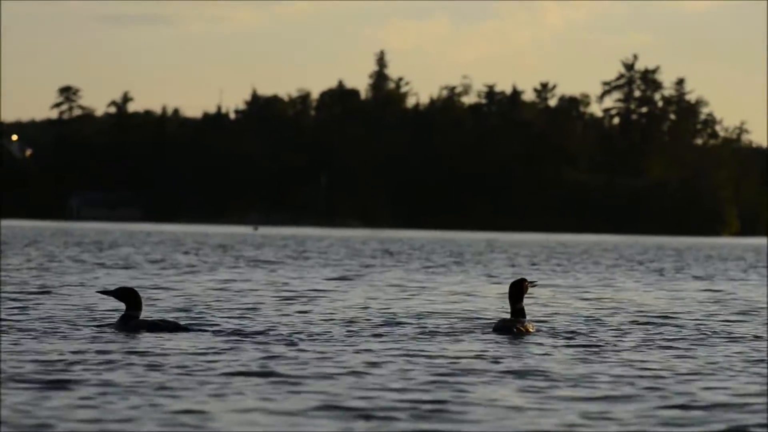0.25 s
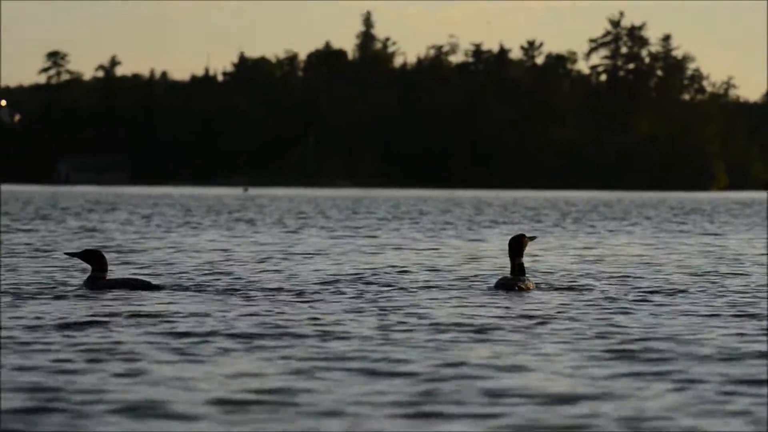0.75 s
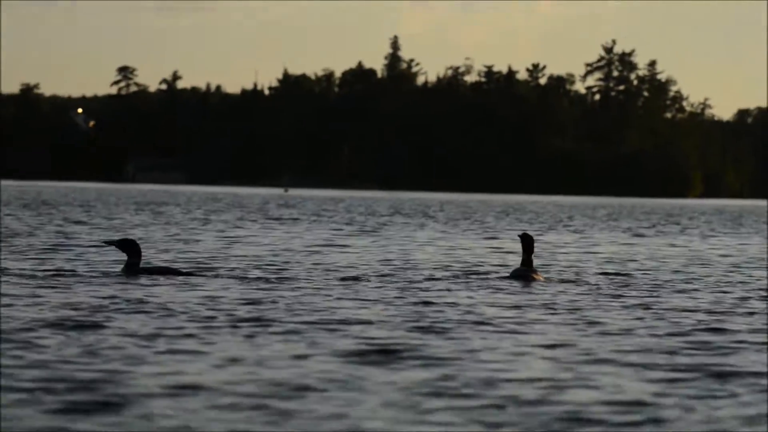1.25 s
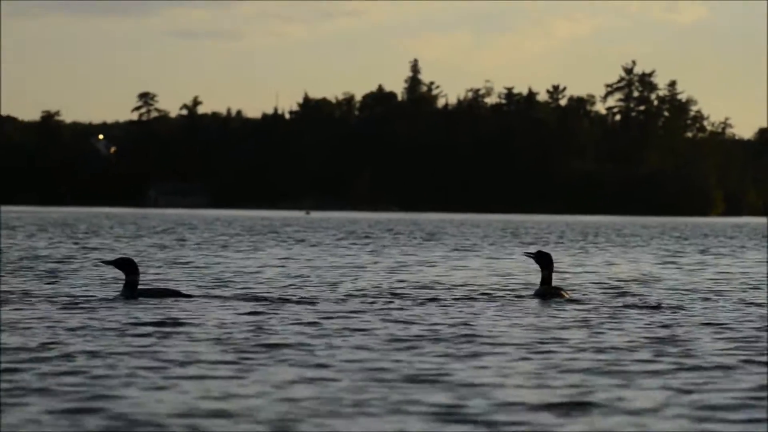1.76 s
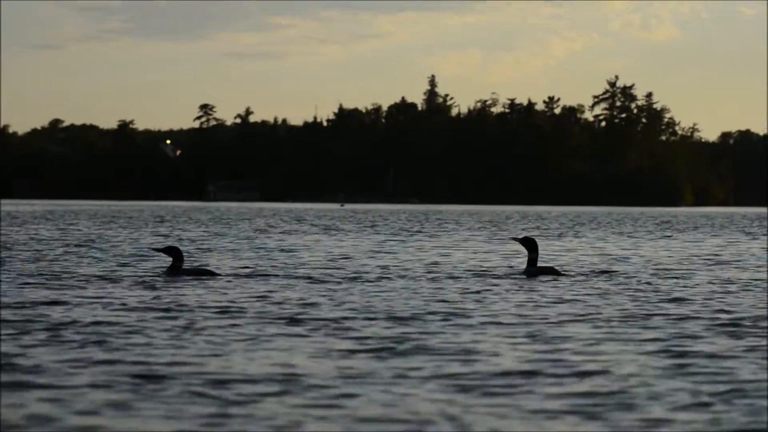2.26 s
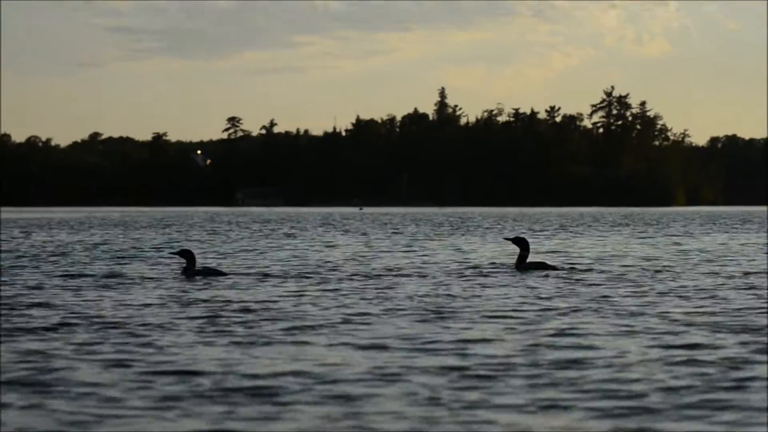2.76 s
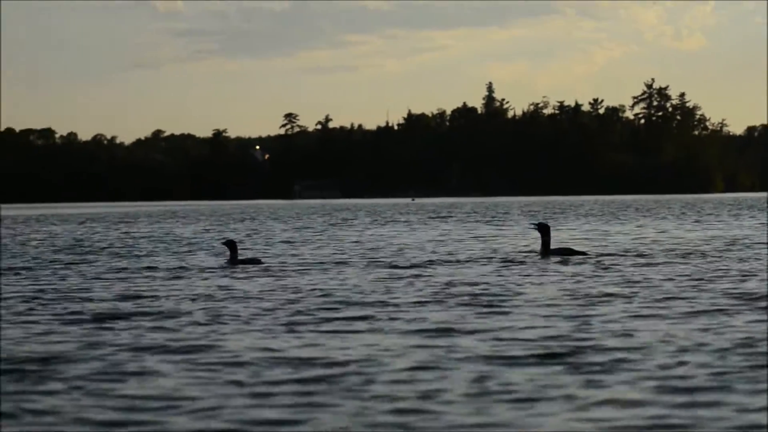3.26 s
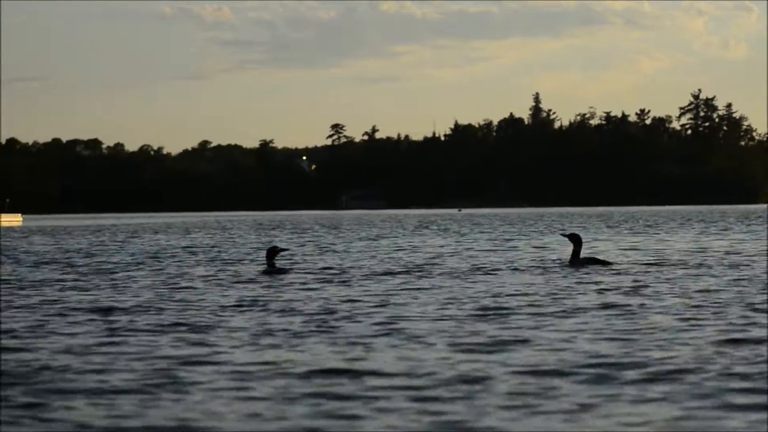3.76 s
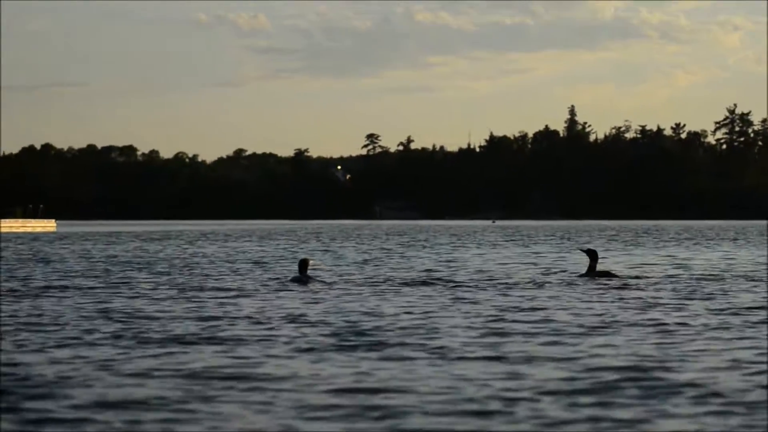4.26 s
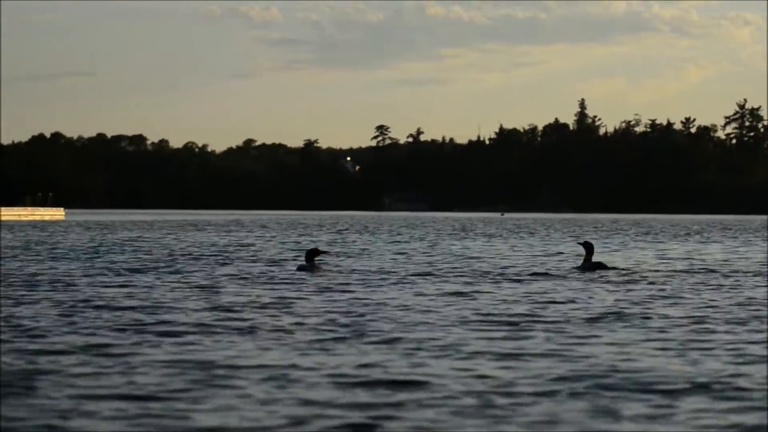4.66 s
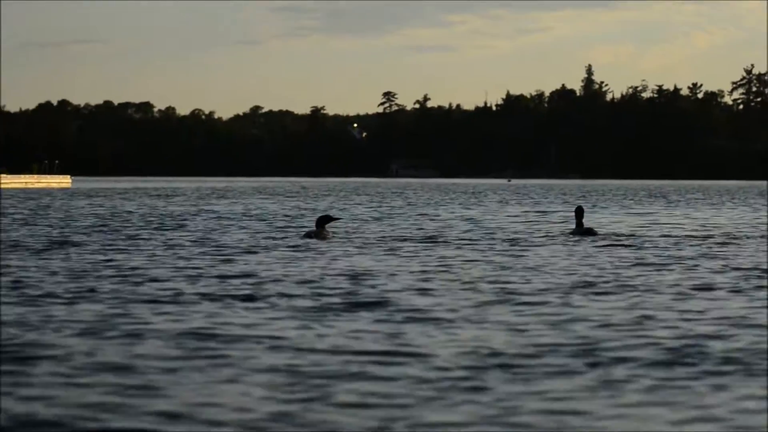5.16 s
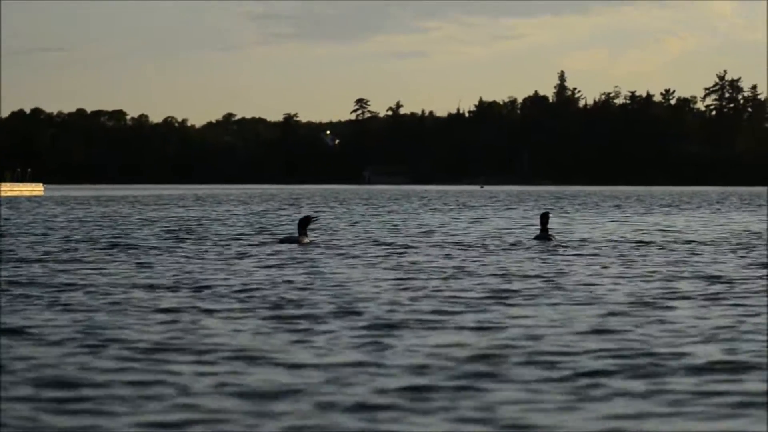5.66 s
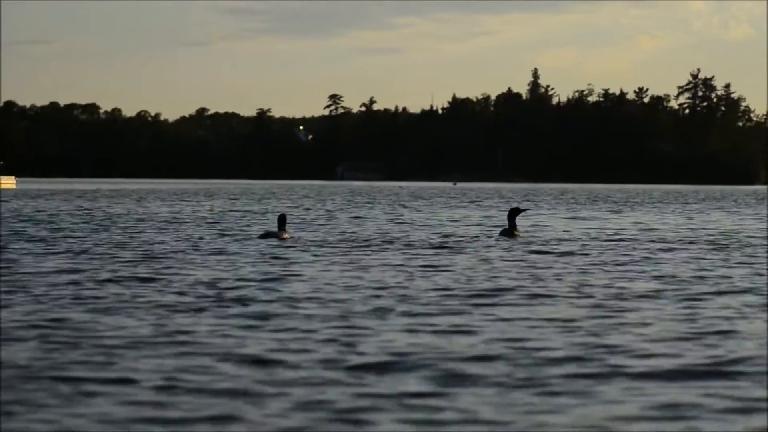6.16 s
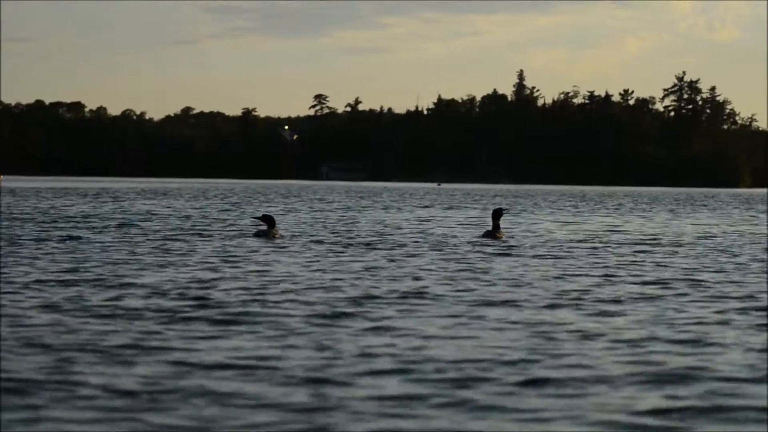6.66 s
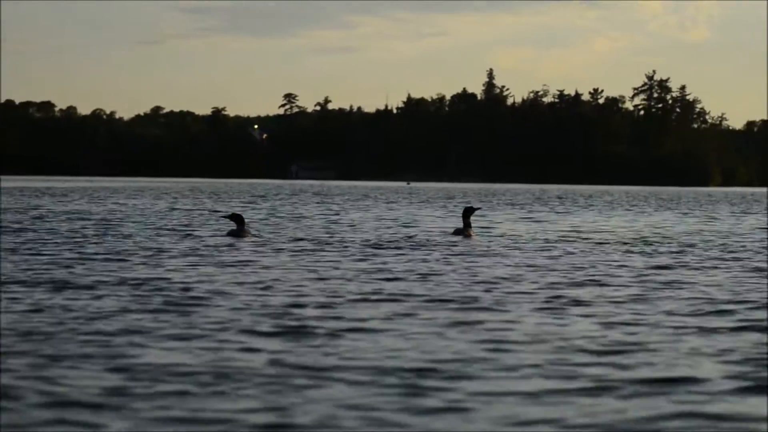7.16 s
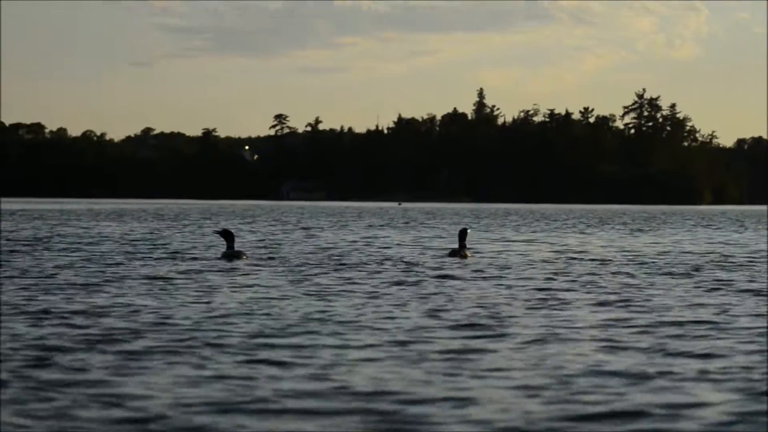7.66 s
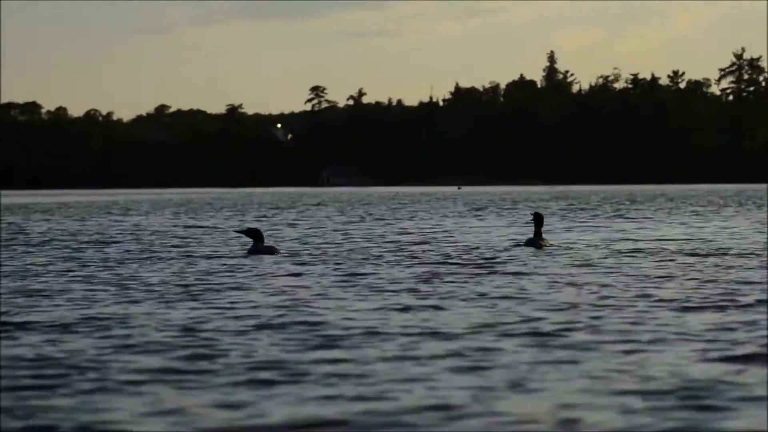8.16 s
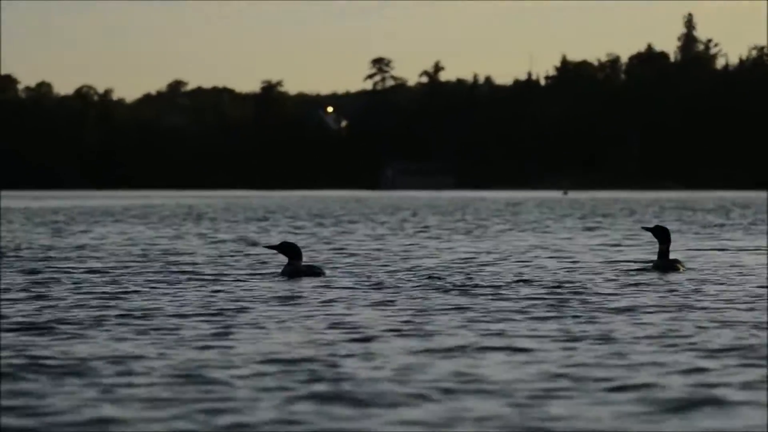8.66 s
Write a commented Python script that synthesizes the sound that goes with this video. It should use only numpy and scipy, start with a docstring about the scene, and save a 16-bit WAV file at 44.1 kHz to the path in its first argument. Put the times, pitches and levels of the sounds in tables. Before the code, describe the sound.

Wavering loon calls leap upward and ring with a long echo, while a breeze rumbles and the microphone hisses.

```python
"""An evening lake, where two loons trade tremolo calls. Each call is a nearly pure tone, modulated in
pitch and level about ten times a second, that breaks upward from register to register. Reflections
from the wooded shore hold the notes as a long ringing echo. Eddies of a breeze buffet the microphone
of a hand-held camera, which hisses, rustles and clicks; a small bird chips far away."""
import sys
import numpy as np
from scipy import signal
from scipy.fft import rfft, irfft, next_fast_len
from scipy.io import wavfile
from scipy.ndimage import map_coordinates

SR = 44100
rng = np.random.default_rng(int(sys.argv[2]) if len(sys.argv) > 2 else 0)


def transcribe(signal):
    """Save signal, clipped to [-1, 1], as a 16-bit WAV file at the path in sys.argv[1]."""
    frames = np.atleast_2d(signal).T
    limited = np.clip(frames, -1, 1)
    pcm = np.round(limited * 32767).astype(np.int16)
    wavfile.write(sys.argv[1], SR, pcm)


N = 393372
TIME = np.arange(N) / SR
TOP_HZ, EDGE_S = 15850, .004  # upper band limit; half the ramp at each end of a note


# Notes of the first loon, a table per register; the tremolo swings down from its crests. Each row: start,
# end and time of one crest in seconds, tremolo rate in Hz, crest pitch in Hz, glide in octaves per second,
# swing in octaves, crest level in dB, level slope in dB per second, overtone offset in dB.
FIRST_LOW_NOTES = [(0.325, 0.464, 0.34, 9.5, 778.0, 1.78, 0.22, -19.3, 55.0, -2.2),
                   (1.695, 1.781, 1.704, 11.4, 795.0, 4.39, 0.24, -20.7, 136.0, -1.9),
                   (3.092, 3.18, 3.09, 11.5, 772.0, 4.9, 0.17, -19.1, 214.0, 2.3),
                   (4.905, 5.127, 4.913, 9.7, 804.0, 1.74, 0.26, -22.6, 82.0, -1.0),
                   (5.485, 5.58, 5.525, 9.1, 754.0, -0.22, 0.17, -22.2, -53.0, 0.1),
                   (6.438, 6.535, 6.45, 11.4, 804.0, 3.36, 0.22, -19.0, 123.0, 4.0),
                   (8.064, 8.154, 8.084, 11.1, 827.0, 3.06, 0.23, -18.8, 89.0, 0.6)]
FIRST_MIDDLE_NOTES = [(0.465, 0.918, 0.541, 10.1, 1216.0, -0.3, 0.34, -13.7, -20.0, -0.7),
                      (1.782, 1.937, 1.792, 11.1, 1286.0, 0.61, 0.3, -10.6, -9.0, 1.7),
                      (3.181, 3.342, 3.177, 11.4, 1301.0, 0.78, 0.34, -9.0, -44.0, 3.2),
                      (5.128, 5.485, 5.117, 10.8, 1300.0, -0.38, 0.41, -12.3, -17.0, -0.8),
                      (6.536, 6.716, 6.541, 11.2, 1312.0, 0.53, 0.35, -9.5, -20.0, 2.2),
                      (6.972, 7.078, 7.024, 8.0, 1019.0, -0.27, 0.08, -22.4, 34.0, 0.3),
                      (8.155, 8.322, 8.177, 11.1, 1320.0, 0.36, 0.32, -9.5, -15.0, -3.3),
                      (8.606, 8.713, 8.661, 8.2, 1068.0, -0.52, 0.12, -20.7, -24.0, 8.6)]
FIRST_TOP_NOTES = [(1.938, 2.312, 1.978, 10.8, 1486.0, -0.43, 0.22, -12.7, -22.0, 2.1),
                   (3.343, 3.692, 3.363, 10.8, 1499.0, -0.52, 0.25, -13.5, -21.0, 4.8),
                   (6.717, 6.97, 6.73, 10.7, 1499.0, -0.45, 0.25, -12.4, -18.0, -0.1),
                   (8.323, 8.603, 8.363, 10.8, 1508.0, -0.36, 0.21, -12.5, -14.0, -4.0)]
# Resonances of its throat and bill. Each row: frequency in Hz, relative overtone level in dB.
FIRST_LOW_TRACT = [(1200, -0.5), (1520, -2), (1800, -10), (1950, -25), (2300, -14.5), (2750, -45),
                   (3300, -34), (4100, -29), (5000, -39.5), (6200, -47.5), (8000, -49.5), (14000, -74)]
FIRST_UPPER_TRACT = [(1200, -6), (1520, 0), (1900, -26), (2300, -19), (2750, -40), (3200, -38.5),
                     (3900, -29.5), (4500, -32.5), (5200, -38), (5900, -56), (6600, -43), (7500, -58.5),
                     (10000, -64.5), (15000, -86.5)]

def first_loon():
    """Register breaks: the voice climbs in jumps through three modes of vibration."""
    low = tremolo(FIRST_LOW_NOTES, slowing=.03, shape=1.44, dip_db=31, deepen=-2.3, lead_s=-.006,
                  scoop_s=.03)
    middle = tremolo(FIRST_MIDDLE_NOTES, slowing=.24, shape=1.16, dip_db=25, deepen=.3, lead_s=.001,
                     arch=2.42, arch_db=14)
    top = tremolo(FIRST_TOP_NOTES, slowing=.28, shape=1.21, dip_db=44, deepen=1.3, lead_s=.002,
                  arch=1.48, arch_db=36)
    return (sing(low + moans(), FIRST_LOW_TRACT, overtone_db=2.2, crest_db=12, tilt_db=-3,
                 jitter=.0036, rasp=.15, third_db=-40.5, attack_s=.0035, crack_out=.055)
            + sing(middle, FIRST_UPPER_TRACT, overtone_db=0, crest_db=18, tilt_db=-6.5,
                   jitter=.00074, rasp=.06, third_db=-43, attack_s=.0033, crack_in=.03)
            + sing(top, FIRST_UPPER_TRACT, overtone_db=-3.5, crest_db=-4, tilt_db=3.3,
                   jitter=.0007, rasp=.05, third_db=-63, attack_s=.003))


# Notes of the second loon, with the same columns as those of the first.
SECOND_LOW_NOTES = [(1.312, 1.425, 1.308, 8.9, 860.0, 2.86, 0.3, -19.4, 72.0, -8.0),
                    (3.39, 3.538, 3.416, 7.2, 876.0, 3.75, 0.37, -26.1, 84.0, -12.4),
                    (3.705, 3.82, 3.745, 9.5, 777.0, -0.13, 0.24, -27.3, -78.0, -11.7),
                    (5.585, 5.755, 5.577, 10.0, 857.0, 1.3, 0.31, -21.9, 42.0, -9.6),
                    (7.333, 7.432, 7.341, 10.8, 827.0, 2.83, 0.28, -23.2, 66.0, -5.7)]
SECOND_MIDDLE_NOTES = [(1.427, 1.755, 1.409, 10.9, 1237.0, -1.01, 0.45, -11.8, -38.0, -7.8),
                       (3.54, 3.7, 3.533, 11.0, 1241.0, 0.39, 0.45, -20.3, 24.0, -10.4),
                       (5.756, 6.036, 5.775, 10.2, 1241.0, -1.03, 0.47, -13.4, -23.0, -11.0),
                       (7.434, 7.792, 7.433, 10.9, 1254.0, -0.85, 0.45, -11.4, -18.0, -6.4)]
# Resonances of its throat and bill. Each row: frequency in Hz, relative overtone level in dB.
SECOND_TRACT = [(1200, -20), (1550, -0.5), (1950, -23), (2300, -21), (2750, -42), (3300, -22), (4000, -30),
                (4900, -26), (6000, -45.5), (7700, -37.5), (9200, -54.5), (15000, -67)]

def second_loon():
    """Jitter: a less regular vibration makes this voice harsher; it keeps to two registers."""
    low = tremolo(SECOND_LOW_NOTES, slowing=.08, shape=1.43, dip_db=15.4, deepen=1.6, scoop_s=.025)
    middle = tremolo(SECOND_MIDDLE_NOTES, slowing=.38, shape=1.61, dip_db=19.4, deepen=1.6, lead_s=.003,
                     arch=4.98, arch_db=17)
    return (sing(low, SECOND_TRACT, overtone_db=13.5, crest_db=16, tilt_db=-1.2,
                 jitter=.007, rasp=.15, third_db=-50, attack_s=.0073, crack_out=.075)
            + sing(middle, SECOND_TRACT, overtone_db=4, crest_db=21, tilt_db=-1,
                   jitter=.002, rasp=.15, third_db=-58.5, attack_s=.0074, crack_in=.04))


def tremolo(notes, slowing, shape, dip_db, deepen, lead_s=0, arch=0, arch_db=0, scoop_s=0):
    """Coupled frequency and amplitude modulation: level falls with pitch (dip_db, arch_db per octave)."""
    scoop_octaves, scoop_db = .6, 20  # a scooped note slides in from this much lower and softer
    gestures = []
    for start, end, crest, rate, hz, glide, swing, db, slope, overtone_db in notes:
        t = TIME[(TIME > start - scoop_s - EDGE_S) & (TIME < end + EDGE_S)]
        from_middle = t - (start + end) / 2
        trough = lambda u: 1 - np.abs(np.cos(np.pi * rate * u * (1 - slowing * u))) ** shape
        sag = arch * from_middle ** 2
        scoop = np.clip((start + EDGE_S - t) / scoop_s, 0, 1) if scoop_s else 0
        octaves = glide * from_middle - sag - swing * trough(t - crest) - scoop_octaves * scoop
        dip = dip_db * swing * (1 + deepen * (t - start)) * trough(t - crest + lead_s)
        level_db = db + slope * from_middle - arch_db * sag - dip - scoop_db * np.sqrt(scoop)
        gestures.append((t, hz * 2 ** octaves, level_db, overtone_db))
    return gestures


# Moans that close the calls. Each row: start in seconds, initial pitch in Hz, initial level in dB.
CLOSING_MOANS = [(.918, 672, -30), (2.322, 697, -30), (6.037, 672, -32), (7.076, 675, -29),
                 (7.793, 660, -34), (8.713, 680, -33)]

def moans(length_s=.065, sag_hz_per_s=700, fade_db_per_s=170, overtone_db=-1):
    """Falling driving pressure: as the breath runs out, pitch and level sink together."""
    t = TIME[TIME < length_s]
    return [(start + t, hz - sag_hz_per_s * t, db - fade_db_per_s * t, overtone_db)
            for start, hz, db in CLOSING_MOANS]


def sing(gestures, tract, overtone_db, crest_db, tilt_db, jitter, rasp, third_db, attack_s,
         crack_in=0, crack_out=0):
    """Source and filter: throat and bill weight the harmonics of a nearly pure tone."""
    crack_s, choke_db = .022, 5  # the voice is rough around a register break and weaker just before it
    out = np.zeros(N)
    loudest_db = max(db.max() for _, _, db, _ in gestures)
    for t, pitch, db, offset_db in gestures:
        since, until = t - t[0], t[-1] - t
        crack = crack_in * swell(since, crack_s) + crack_out * swell(until, crack_s)
        rough_pitch = pitch * (1 + jitter * wobble(500, t) + crack * wobble(900, t))
        phase = 2 * np.pi * np.cumsum(rough_pitch) / SR
        # brightness follows the bird's push at each crest, and soft notes are duller
        push_db = crest_db * np.log2(pitch / pitch.mean())
        bright_db = overtone_db + offset_db + push_db + .27 * (db.max() - loudest_db)
        overtones = 0
        for k in range(2, 13):
            octaves_up = np.log2(k / 2)
            level_db = along(tract, k * pitch) + bright_db + tilt_db * octaves_up + 4 * wobble(35, t)
            flutter = 1 + rasp * octaves_up * wobble(700, t)
            overtones += amp(level_db) * flutter * np.sin(k * phase) * (k * pitch < TOP_HZ)
        # period tripling: under strain every third cycle differs, adding faint lines between harmonics
        strain = amp(third_db + push_db + 3.3 * wobble(12, t))
        overtones += strain * sum(np.sin(k * phase / 3) for k in (2, 4, 5))
        gate = np.sin(np.pi / 2 * np.clip(np.minimum(since, until) / (2 * EDGE_S), 0, 1)) ** 2
        choke = amp(-choke_db * swell(until, crack_s)) if crack_out else 1
        tone = choke * np.sin(phase) + overtones * (1 - np.exp(-since / attack_s))
        envelope = amp(db + .19 * wobble(120, t)) * gate
        out[round(t[0] * SR):][:len(t)] += np.sqrt(2) * envelope * tone
    return out


# Reverberation of the wooded shore. Each row: frequency in Hz, time to decay by 60 dB in seconds.
SHORE_DECAY = [(500, 4.3), (1000, 3.44), (1500, 1.9), (4500, 2.4), (9000, 0.66)]
# Colour of the echo. Each row: frequency in Hz, relative gain in dB.
SHORE_COLOUR = [(500, -21), (800, -7.5), (1050, -2.5), (1500, 2), (1900, -9), (2500, -3), (3300, -12),
                (4600, 0), (9000, -8.5)]

def shore_echo(calls, echo_db, build_s, ripple_db):
    """Reverberation: trees at all distances return a slow tail; nearby wavelets mirror the overtones."""
    hz, t, spectra = signal.stft(rng.standard_normal(3 * SR), SR, nperseg=256)
    envelope = amp(-60 * t / along(SHORE_DECAY, hz)[:, None]) * (1 - np.exp(-t / build_s))
    tail = signal.istft(spectra * envelope, SR, nperseg=256)[1]
    tail = filtered(tail, lambda f: amp(along(SHORE_COLOUR, f) + echo_db)) / np.sqrt(SR)
    # early reflections interfere, so each overtone swells and fades as it sweeps
    ripples = unit(rng.standard_normal(len(tail))) * amp(-60 * TIME[:len(tail)] / .03)
    ripples = filtered(ripples / np.linalg.norm(ripples), lambda f: f ** 6 / (f ** 6 + 2000 ** 6))
    return signal.fftconvolve(calls, tail + amp(ripple_db) * ripples)[:N]


def lingering_echo(level_db, t60_s):
    """Free decay: at the outset the shore still rings in the bands of an earlier call."""
    call_bands = [(700, -43.5), (980, -11), (1220, -9), (1350, -24), (1520, -11), (1750, -54)]
    return amp(level_db - 60 * TIME / t60_s) * noise(call_bands)


# Strength of the breeze. Each row: time in seconds, rumble level in dB.
BREEZE_LEVEL = [(0, -43), (.4, -34), (.9, -38), (1.7, -37), (2.6, -29.5), (3.1, -36.5), (3.45, -41),
                (4, -36), (5.6, -35.5), (6.3, -37.5), (7, -40), (8.3, -37.5), (8.55, -47), (8.85, -43)]
# Spectrum of its rumble. Each row: frequency in Hz, relative level in dB.
RUMBLE_SPECTRUM = [(20, -19), (45, -5), (80, 0), (170, -4.5), (300, -15.5), (600, -34), (1500, -66.5)]
# Single eddies. Each row: peak time in seconds, relative level in dB, length in seconds, corner in Hz.
EDDIES = [(0.051, -15.7, 0.024, 240), (0.288, -21.3, 0.017, 190), (0.38, -21.3, 0.019, 190),
          (0.746, -22.7, 0.014, 210), (1.258, -19.0, 0.032, 200), (1.625, -22.6, 0.017, 310),
          (1.829, -18.5, 0.014, 170), (2.047, -21.4, 0.027, 320), (2.448, -13.9, 0.024, 340),
          (2.624, -17.6, 0.013, 170), (2.722, -13.3, 0.022, 260), (2.815, -15.1, 0.024, 220),
          (2.961, -16.6, 0.029, 270), (3.077, -17.9, 0.014, 160), (3.161, -13.6, 0.026, 280),
          (3.769, -25.0, 0.013, 310), (4.126, -21.6, 0.033, 230), (4.205, -13.9, 0.015, 220),
          (4.354, -20.7, 0.017, 160), (4.524, -20.2, 0.018, 220), (4.739, -12.1, 0.019, 250),
          (4.93, -14.2, 0.017, 240), (5.2, -16.9, 0.029, 330), (5.409, -22.2, 0.017, 230),
          (5.536, -18.3, 0.024, 330), (5.627, -16.5, 0.014, 230), (5.713, -18.8, 0.014, 190),
          (6.239, -22.1, 0.015, 190), (6.602, -24.4, 0.017, 160), (7.186, -22.3, 0.017, 180),
          (7.446, -23.4, 0.015, 150), (7.53, -21.2, 0.013, 290)]

def wind(eddy_db, lump_db):
    """Turbulent pressure: separate eddies thump the microphone over a rumble that comes and goes."""
    out = amp(curve(BREEZE_LEVEL) + lump_db * np.tanh(wobble(18))) * noise(RUMBLE_SPECTRUM)
    for peak, db, length, corner_hz in EDDIES:
        span = abs(TIME - peak) < .12
        envelope = swell(TIME[span] - peak, length)
        low_cut = lambda hz: hz ** 2 / np.hypot(hz ** 2, 65 ** 2)
        band = lambda hz: low_cut(hz) / np.hypot(1, (hz / corner_hz) ** 3) / np.hypot(1, (hz / 800) ** 4)
        eddy = envelope * filtered(rng.standard_normal(len(envelope)), band)
        out[span] += amp(db + eddy_db) * unit(eddy) * np.sqrt(np.mean(envelope ** 2))
    return out


# Fingers sliding on the camera. Each row: peak time in seconds, level in dB, length in seconds.
FINGER_RUBS = [(0.842, -46, 0.021), (0.916, -59, 0.2), (1.354, -52.5, 0.01), (2.903, -62, 0.13),
               (8.078, -52.5, .22), (8.8, -62, .2)]
# Clicks of its body. Each row: start in seconds, level in dB, time to decay by 60 dB in seconds.
BODY_CLICKS = [(.839, -38, .008), (0.985, -33, 0.018), (2.978, -21, 0.018), (4.803, -21, .08),
               (8.099, -40, 0.007)]
# Spectra of the rubs and of the clicks. Each row: frequency in Hz, relative level in dB.
RUB_SPECTRUM = [(1500, -5), (4500, -3), (8500, 0.5), (12000, -5.5), (15500, -24.5)]
CLICK_SPECTRUM = [(200, -1.5), (700, 2.5), (1700, -2.5), (2600, -9.5), (3200, -8), (4000, -13),
                  (4900, -10.5), (6200, -14), (7800, -14.5), (11000, -28.5), (15000, -39.5)]

def handling():
    """Friction and impact: sliding skin rustles, and the camera body clicks with a damped decay."""
    rubs = sum(amp(db) * swell(TIME - peak, length) for peak, db, length in FINGER_RUBS)
    clicks = sum(amp(db - 60 * abs(TIME - start) / t60) * (TIME >= start)
                 for start, db, t60 in BODY_CLICKS)
    return rubs * noise(RUB_SPECTRUM) + clicks * noise(CLICK_SPECTRUM)


# Drift of the hiss. Each row: time in seconds, relative level in dB.
HISS_LEVEL = [(0, -69), (.75, -72), (1.1, -69.5), (2.3, -74), (2.9, -69.5), (6.85, -72), (8.9, -69.5)]
# Spectrum of the hiss. Each row: frequency in Hz, relative level in dB.
HISS_SPECTRUM = [(100, 11), (700, 17.5), (1400, 18.5), (2000, 7.5), (3400, 4.5), (5000, 3), (9000, -1.5),
                 (15500, -6)]
# Tones of the camera electronics. Each row: frequency in Hz, level in dB.
WHINE_TONES = [(7628, -86), (10164, -84)]

def camera_hiss(gain_db):
    """Noise floor: a wavering broadband hiss, with the thin steady whine of the electronics."""
    hiss = amp(curve(HISS_LEVEL) + gain_db) * noise(HISS_SPECTRUM)
    whine = sum(np.sqrt(2) * amp(db) * np.sin(2 * np.pi * hz * TIME) for hz, db in WHINE_TONES)
    return hiss + whine


# Chips of the small bird. Each entry: peak time in seconds.
CHIP_TIMES = [3.925, 4.04, 4.171, 4.29, 4.415, 4.546]

def small_bird(pitch_hz, level_db, length_s):
    """Narrow-band noise pulses: thin chips, their pitch blurred by distance."""
    band = unit(filtered(rng.standard_normal(N), lambda hz: swell(hz - pitch_hz, 450)))
    return amp(level_db) * band * sum(swell(TIME - peak, length_s) for peak in CHIP_TIMES)


def amp(db):
    """Decibels as an amplitude ratio."""
    return 10 ** (np.asarray(db) / 20)


def unit(x):
    """Normalisation to an rms of 1."""
    return x / np.sqrt(np.mean(x ** 2) + 1e-20)


def along(points, hz):
    """Interpolation of (Hz, value) points on a logarithmic frequency axis."""
    freqs, values = np.transpose(points)
    return np.interp(np.log(hz + 1), np.log(freqs + 1), values)


def curve(rows):
    """Linear interpolation of (seconds, value) rows."""
    return np.interp(TIME, *np.transpose(rows))


def wobble(rate, t=TIME):
    """Smooth random modulation with rate knots a second."""
    position = (t - t[0]) * rate
    return map_coordinates(rng.standard_normal(int(position[-1]) + 4), [position + 1])


def filtered(x, gain):
    """Zero-phase filtering by a gain that depends on frequency."""
    size = next_fast_len(len(x) + 8192)
    return irfft(rfft(x, size) * gain(np.fft.rfftfreq(size, 1 / SR)), size)[:len(x)]


def noise(spectrum):
    """Coloured noise of rms 1 with a (Hz, dB) spectrum."""
    return unit(filtered(rng.standard_normal(N), lambda hz: amp(along(spectrum, hz))))


def swell(x, width):
    """A Gaussian bell around x = 0."""
    return np.exp(-2 * np.minimum((x / width) ** 2, 20))


def scene():
    """Superposition: birds, echo, wind and camera noises add at one microphone."""
    calls = first_loon() + second_loon()
    echo = shore_echo(calls, echo_db=-7.5, build_s=.19, ripple_db=-3)
    echo += lingering_echo(level_db=-38, t60_s=2.1)
    breeze = wind(eddy_db=-.5, lump_db=9)
    chips = small_bird(pitch_hz=3450, level_db=-56.5, length_s=.023)
    camera = camera_hiss(gain_db=19) + handling()
    return (calls + echo + breeze + chips + camera)[None]


def record(dry):
    """Band limiting: the camera keeps nothing above TOP_HZ."""
    return filtered(dry[0], lambda hz: hz < TOP_HZ)[None]


dry = scene()
out = record(dry)
transcribe(out)
```